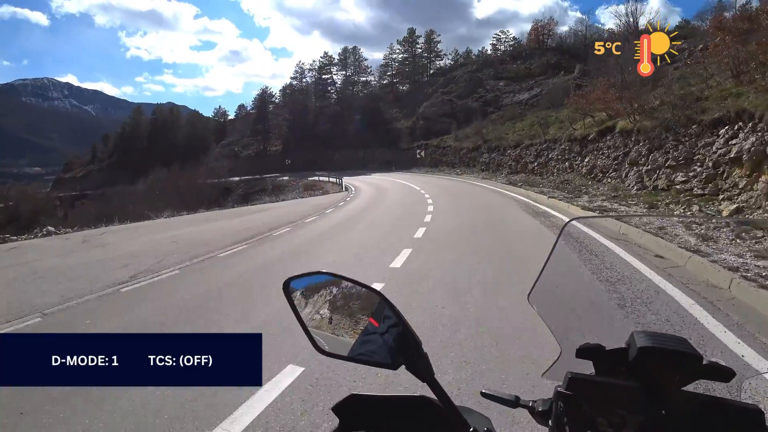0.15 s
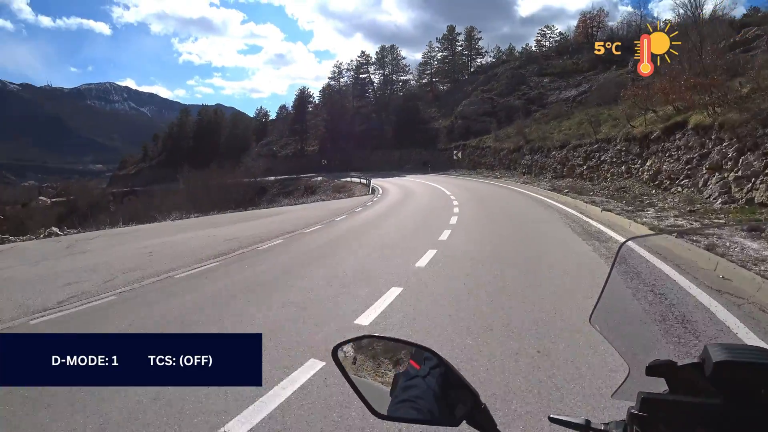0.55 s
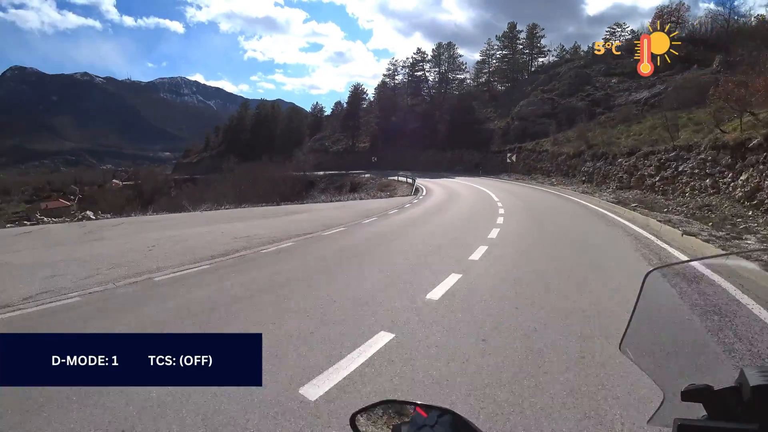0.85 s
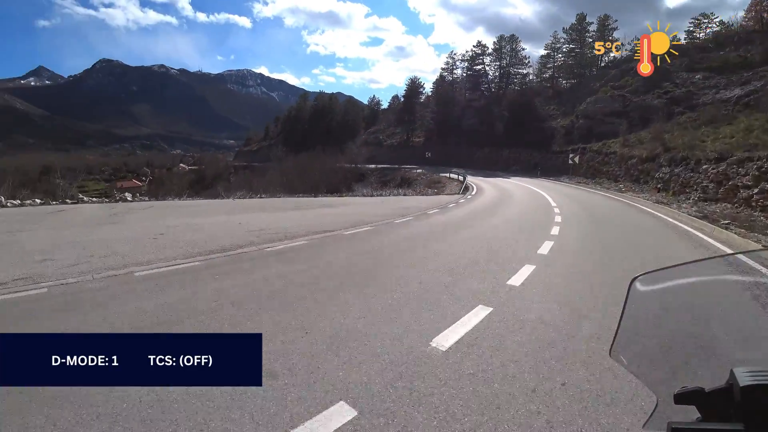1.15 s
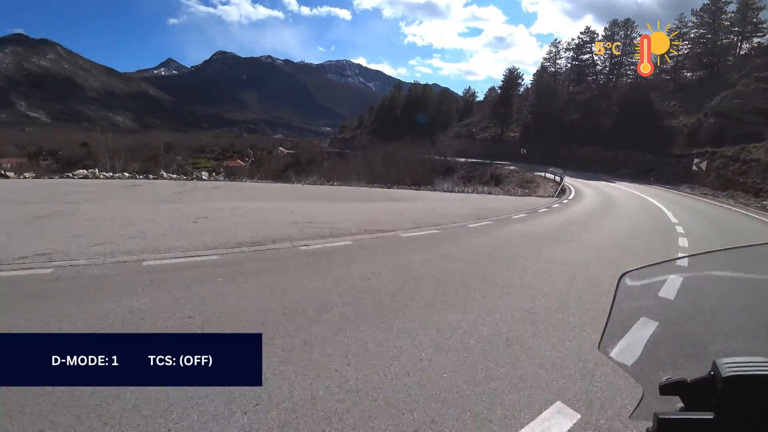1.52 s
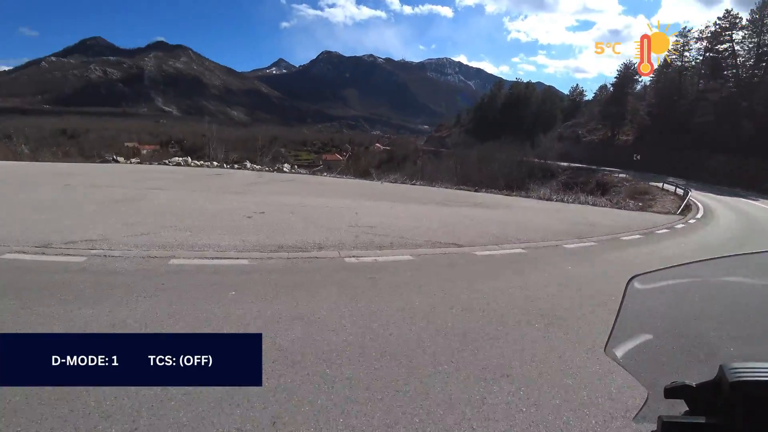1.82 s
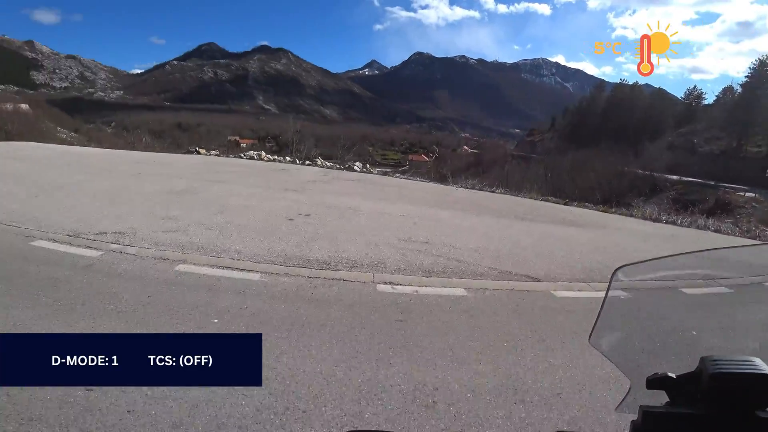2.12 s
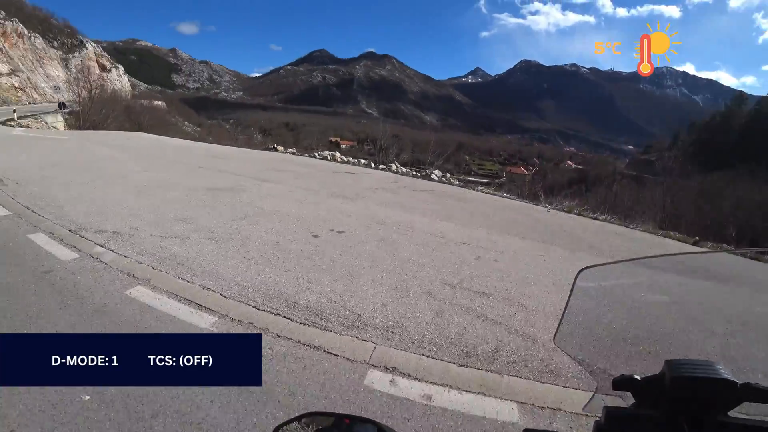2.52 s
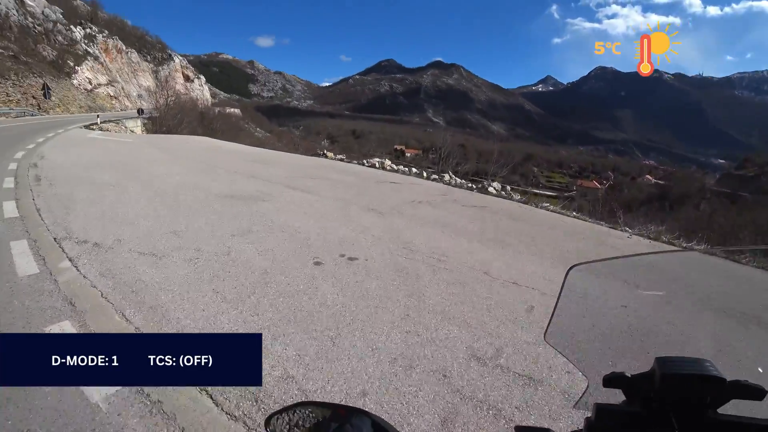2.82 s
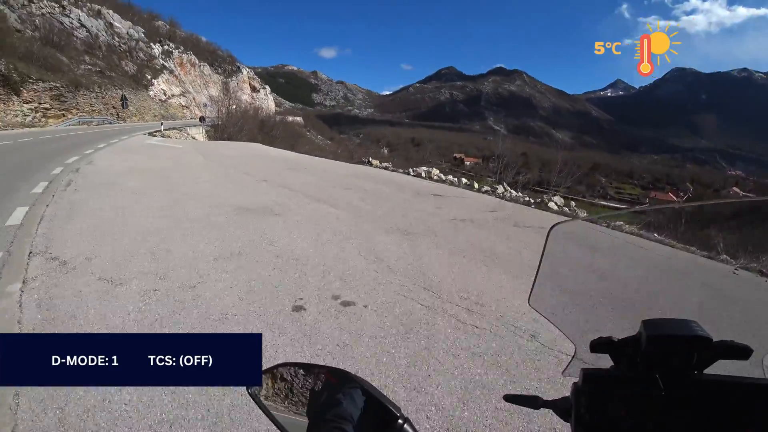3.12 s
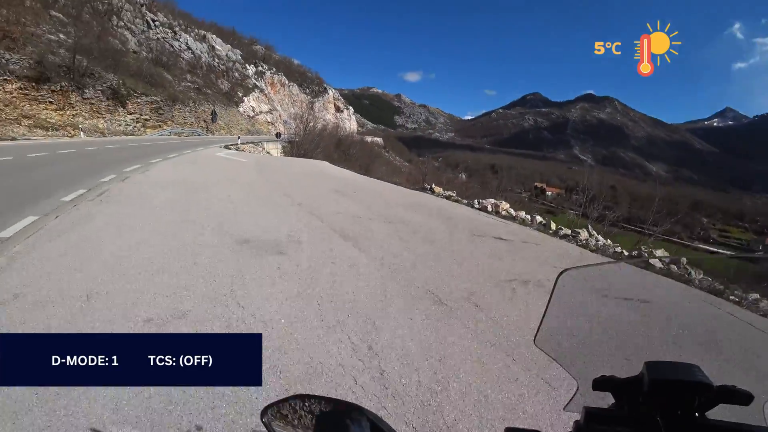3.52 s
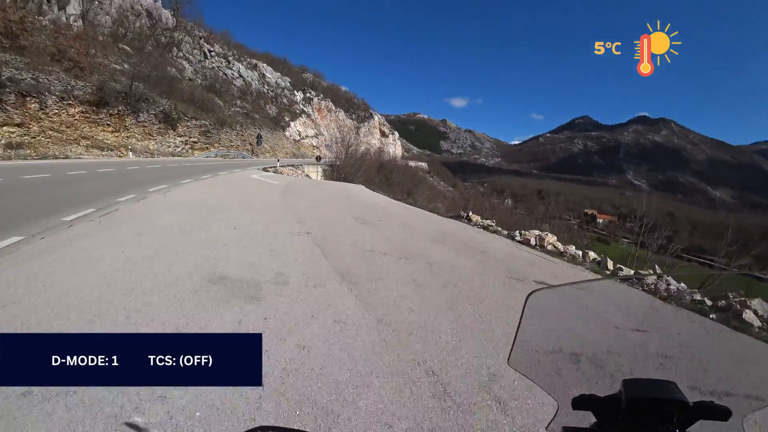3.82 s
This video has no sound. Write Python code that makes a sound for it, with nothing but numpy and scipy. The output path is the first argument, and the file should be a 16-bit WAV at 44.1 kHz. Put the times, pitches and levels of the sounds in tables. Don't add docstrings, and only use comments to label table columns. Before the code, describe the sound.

Low, thumping motorcycle idle with faint wind buffets, ending in a dull clunk and brake hiss

```python
import sys
import numpy as np
from scipy import signal
from scipy.fft import rfft, irfft
from scipy.io import wavfile

SR = 44100
rng = np.random.default_rng(int(sys.argv[2]) if len(sys.argv) > 2 else 0)


def wrap_up_sound(samples):
    columns = np.atleast_2d(samples).T
    tamed = np.clip(columns, -1, 1)
    steps = np.round(tamed * 32767).astype(np.int16)
    wavfile.write(sys.argv[1], SR, steps)


def attenuation_scalar(level_db):
    decades = np.asarray(level_db, float) / 20
    return 10 ** decades


N = 174195

# time_s, firing_rate_hz
FIRING_RATE = [(0.0, 32.96), (0.292, 34.89), (0.433, 34.62), (0.768, 35.54), (0.819, 34.46), (1.196, 33.06),
               (1.464, 32.94), (1.61, 34.99), (1.883, 34.15), (2.245, 33.51), (2.245, 34.36),
               (2.605, 34.01), (2.826, 33.12), (3.102, 36.0), (3.232, 33.88), (3.282, 34.7), (3.664, 32.09),
               (3.95, 34.74)]
# time_s, level_db
FIRING_LOAD = [(0, -4.5), (1, -4), (2, -3.5), (3, -3), (3.95, -2.5)]
CYLINDER_LEVELS = [.3, -.9, .2]
# time_s, change_db
WEAK_FIRINGS = [(.232, -3), (1.400, -6), (1.927, -7), (2.017, -2), (2.369, -3), (3.421, -2.2), (3.450, -7),
                (3.481, -1.5), (3.542, -2), (3.572, -4), (3.602, -1.5), (3.633, -1.5)]
# lag_s, gain
PULSE_COPIES = [(-.0037, -.17), (.0132, .11)]
# start_s, level_db, contact_cut_hz
DOG_IMPACTS = [
    (3.4167, -12, 520),
    (3.4273, 2.6, 900),
    (3.4354, 2.5, 800),
    (3.4382, -1.5, 353),
    (3.4449, -4.6, 230),
    (3.4532, -5.6, 265),
    (3.462, -12.9, 245),
]
# pitch_hz, level_db, t60_s
GEARBOX_MODES = [(105, -5.7, .085), (203, -8, .065), (312, -7.3, .045), (674, -24, .008), (1030, -23, .01)]
# pitch_hz, width_hz, level_db
JUDDER_MODES = [(165, 35, -24), (262, 25, -19), (65, 30, -22)]
# time_s, level_db
CLUTCH_DRAG = [(0, -11), (.3, -17), (.6, -39), (3.42, -40.5), (3.46, -6.5), (3.55, -1), (3.66, 0.5),
               (3.76, -8), (3.95, -16.5)]
# pitch_hz, width_hz, level_db
DRIVELINE_MODES = [(385, 70, -31), (764, 150, -35), (900, 420, -39), (1600, 250, -53), (2630, 200, -57),
                   (4010, 100, -66)]
# multiple_of_firing_rate, level_db, width_hz, swing_db, peak_turn
GEAR_WHINES = [(63, -53, 94, 2.5, .8), (32.4, -55, 43, 3, .8), (75.2, -65.5, 120, 10.5, 1)]
# time_s, level_db
TOOTH_LOAD = [(0, 2), (1, 3.5), (1.2, 0), (2.4, -1.5), (2.9, -2), (3.95, 0)]
# pitch_hz, level_db
CASING_SPECTRUM = [(40, -4), (250, -9), (400, -15.5), (600, -24), (1200, -34), (2800, -41.5), (3400, -52),
                   (15000, -70.5)]
# pitch_hz, width_hz, level_db
PANEL_MODES = [(343.7, 120, -42.5), (1556, 190, -59), (4040, 650, -69.5), (5670, 400, -85),
               (8400, 890, -79.5), (11130, 810, -79)]
# time_s, level_db
ROLLING_EFFORT = [(0, 2), (.3, -0.5), (1, 1.5), (1.2, -1), (2.5, 0), (3.95, 2.5)]
# time_s, level_db
BRAKE_PRESSURE = [(3.1, -25), (3.3, -17), (3.4, -5), (3.47, 0), (3.6, 0), (3.66, -5), (3.72, -12),
                  (3.83, -15), (3.95, -28)]
# pitch_hz, width_hz, level_db
DISC_MODES = [(6400, 500, -65), (7030, 600, -61), (7880, 230, -63), (9600, 170, -63), (10600, 170, -67),
              (8400, 3500, -62), (14800, 1000, -75)]
# time_s, level_db
WIND_LEVEL = [
    (0, -25),
    (.22, -25.5),
    (.35, -34),
    (1.2, -34.5),
    (1.4, -21),
    (1.6, -34.5),
    (1.95, -31.5),
    (2.05, -22),
    (2.15, -36),
    (3.95, -36),
]


def in_time(rows):
    times_s, values = np.transpose(rows)
    return np.interp(np.arange(N) / SR, times_s, values)


def rms_one(x):
    return x / np.sqrt(np.mean(np.abs(x) ** 2) + 1e-20)


def drift(rate_hz):
    r = np.exp(-2 * np.pi * rate_hz / SR)
    noise = rng.standard_normal(N + SR)
    return rms_one(signal.lfilter([1], [1, -2 * r, r * r], noise)[SR:])


def swell(at_s, length_s):
    return np.exp(-.5 * ((np.arange(N) / SR - at_s) / length_s) ** 2)


def throb(turns, swing_db, peak_turn):
    return attenuation_scalar(swing_db * np.cos(2 * np.pi * (turns - peak_turn)))


def ring(x, hz, t60_s):
    r, w = attenuation_scalar(-60 / (t60_s * SR)), 2 * np.pi * hz / SR
    return signal.lfilter([0, np.sin(w)], [1, -2 * r * np.cos(w), r * r], x + 1e-18)


def resonant_noise(modes, patchy_db=1.5):
    out = 0.
    for hz, width_hz, db in modes:
        r = np.exp(-np.pi * width_hz / SR)
        section = [0.94, 0.00056, -1, 1, -2 * r * np.cos(2 * np.pi * hz / SR), r * r]
        tone = rms_one(signal.sosfilt([section] * 2, rng.standard_normal(N)))
        out = out + attenuation_scalar(db + patchy_db * drift(11)) * tone
    return out


def exhaust(turns):
    puff_s, scatter_db = 0.001629, .55
    pipe_hz, pipe_t60_s, pipe_db = 264, .11, -17
    at = np.flatnonzero(np.diff(np.floor(turns)) > 0)
    db = in_time(FIRING_LOAD)[at] + np.resize(CYLINDER_LEVELS, len(at))
    db = db + scatter_db * rng.standard_normal(len(at))
    for s, change_db in WEAK_FIRINGS:
        db[np.argmin(abs(at / SR - s))] += change_db
    firings = np.zeros(N)
    firings[at] = attenuation_scalar(db)

    t = np.arange(-1200, 1201) / SR

    def puff(lag_s):
        x = (t - lag_s) / puff_s
        return (x ** 2 - 1) * np.exp(-.5 * x ** 2)

    direct = signal.oaconvolve(firings, puff(0), "same")
    pipe = ring(direct, pipe_hz, pipe_t60_s) * 2 * np.pi * pipe_hz / SR
    echoed_puff = puff(0) + sum(gain * puff(lag_s) for lag_s, gain in PULSE_COPIES)
    shake = attenuation_scalar(-28 + 2 * drift(16)) * np.cos(2 * np.pi * (turns + 0.1))
    return signal.oaconvolve(firings, echoed_puff, "same") + attenuation_scalar(pipe_db) * pipe + shake


def afterburn():
    fade_s = .05
    fade = 0.
    for s, change_db in WEAK_FIRINGS:
        age = np.maximum(np.arange(N) / SR - s, 0) / fade_s
        fade = fade - change_db * age * np.exp(1 - age)
    return fade * resonant_noise([(345, 120, -54)])


def gear_change():
    hits = np.zeros(N)
    for s, db, cut_hz in DOG_IMPACTS:
        contact = signal.windows.hann(int(SR / cut_hz))
        start = int(s * SR)
        hits[start:start + len(contact)] += attenuation_scalar(db) * contact
    hits = signal.sosfilt(signal.butter(2, 70.0, "high", fs=SR, output="sos"), hits + 1e-18)
    clunk = sum(attenuation_scalar(db) * 2 * np.pi * hz / SR * ring(hits, hz, t60_s) for hz, db, t60_s in GEARBOX_MODES)
    judder = swell(3.58, .05) * resonant_noise(JUDDER_MODES)
    drag = attenuation_scalar(in_time(CLUTCH_DRAG) + 1.0 * drift(25)) * resonant_noise(DRIVELINE_MODES)
    return clunk + judder + drag


def gears(turns):
    out = 0.
    for multiple, db, width_hz, swing_db, peak_turn in GEAR_WHINES:
        phase = 2 * np.pi * multiple * turns
        tone = rms_one(drift(width_hz) * np.cos(phase) + drift(width_hz) * np.sin(phase))
        load_db = (multiple < 40) * in_time(TOOTH_LOAD)
        out = out + attenuation_scalar(db + load_db) * throb(turns, swing_db, peak_turn) * tone
    return out


def casing(turns):
    hz, db = np.transpose(CASING_SPECTRUM)
    f = np.maximum(np.arange(N // 2 + 1) * SR / N, 1)
    spectrum = attenuation_scalar(np.interp(np.log(f), np.log(hz), db))
    broad = rms_one(irfft(rfft(rng.standard_normal(N)) * spectrum, N))
    noise = attenuation_scalar(-29.5) * broad + resonant_noise(PANEL_MODES)
    effort = attenuation_scalar(in_time(ROLLING_EFFORT) + 1.0 * drift(23))
    return noise * throb(turns, swing_db=0.5, peak_turn=.02) * effort


def valves(turns):
    ticks_per_s = 1500
    born = rng.random(N) < ticks_per_s / SR * throb(turns, swing_db=13, peak_turn=0.96)
    sizes = attenuation_scalar(5.8 * np.minimum(rng.exponential(1, N), 4)) * rng.choice([-1, 1], N)
    band = signal.butter(2, [5000, 13500], "band", fs=SR, output="sos")
    return attenuation_scalar(-72.5) * rms_one(signal.sosfilt(band, born * sizes))


def brake():
    squeak = swell(3.33, .1) * resonant_noise([(15000, 700, -73.5)], patchy_db=4)
    return attenuation_scalar(in_time(BRAKE_PRESSURE)) * resonant_noise(DISC_MODES, patchy_db=2.5) + squeak


def wind():
    band = signal.butter(2, [27, 65], "band", fs=SR, output="sos")
    low = signal.sosfilt(band, rng.standard_normal(N + SR))[SR:]
    return attenuation_scalar(in_time(WIND_LEVEL) + 1 * drift(5)) * rms_one(low)


def scene():
    rate_hz = in_time(FIRING_RATE)
    turns = .1267 + np.cumsum(rate_hz) / SR + rate_hz[0] * .001
    engine = exhaust(turns) + afterburn() + gears(turns) + casing(turns) + valves(turns)
    return (engine + gear_change() + brake() + wind())[None]


def band_limit(x):
    return signal.sosfilt(signal.butter(12, 15720, fs=SR, output="sos"), x)


def record(dry):
    bass_cut = signal.butter(1, 5.5, "high", fs=SR, output="sos")
    mix = np.clip(signal.sosfilt(bass_cut, dry), -1, 1)
    return band_limit(mix)


dry = scene()
out = record(dry)
wrap_up_sound(out)
```